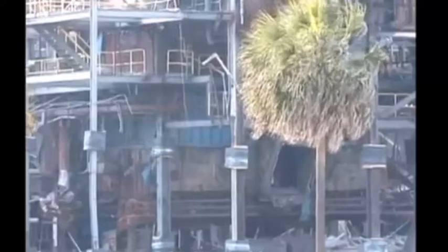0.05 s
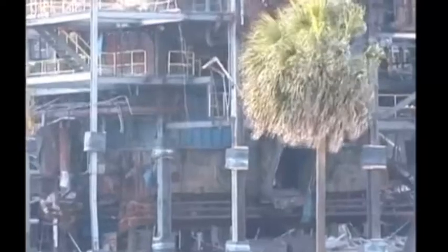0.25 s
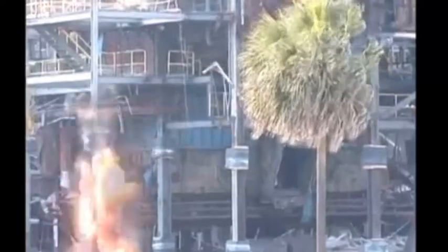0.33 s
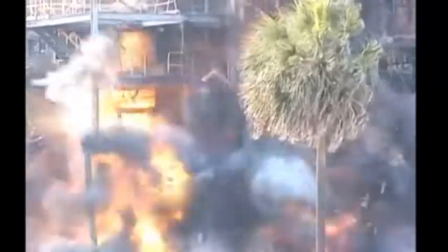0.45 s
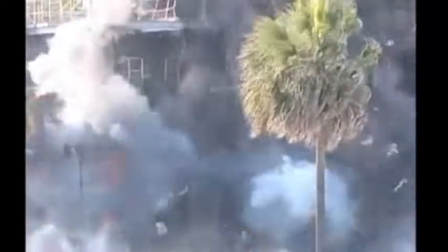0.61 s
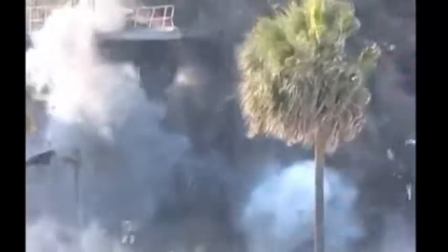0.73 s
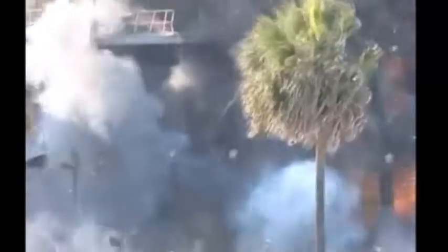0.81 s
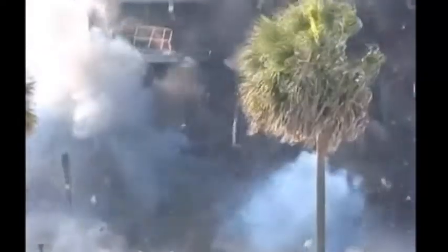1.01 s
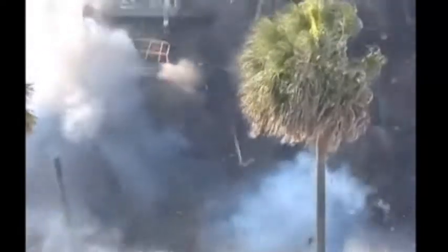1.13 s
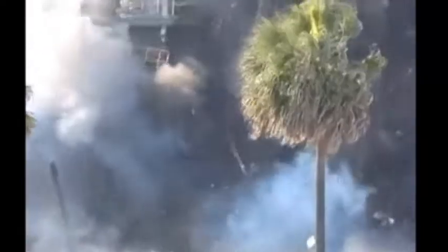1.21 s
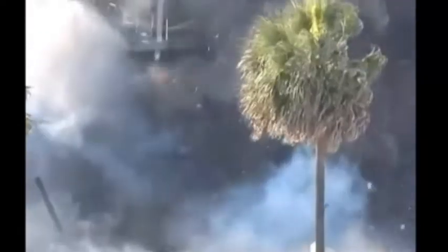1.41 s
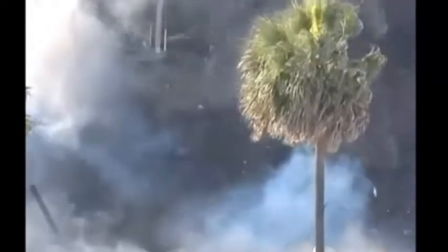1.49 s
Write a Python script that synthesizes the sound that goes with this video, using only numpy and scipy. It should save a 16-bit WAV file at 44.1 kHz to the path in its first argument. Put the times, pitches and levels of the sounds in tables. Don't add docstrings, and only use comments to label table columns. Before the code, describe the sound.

Demolition charges blow in a steel structure outdoors. After brief silence comes a sharp crack, a dense volley of bangs and echoes, then thudding rumble thinning under fine rattling debris, heard through a small camera microphone.

```python
import sys
import numpy as np
from scipy import signal
from scipy.fft import rfft, irfft
from scipy.io import wavfile
from scipy.ndimage import uniform_filter1d

SR = 44100
rng = np.random.default_rng(int(sys.argv[2]) if len(sys.argv) > 2 else 0)


def ratio(d):
    e = np.asarray(d, float) / 20
    return 10 ** e


def file_out(sig):
    cols = np.atleast_2d(sig).T
    lim = np.clip(cols, -1, 1)
    pcm = np.round(lim * 32767).astype(np.int16)
    wavfile.write(sys.argv[1], SR, pcm)


N = 68355
T = np.arange(N) / SR
OPENS_S, SHOCK_S = 0.1915, 0.2178

# pitch_hz, level_db, phase_turns
FRAME_MODES = [
    (808, -18, 0.05),
    (1098, -17, 0.22),
    (2037, -22, 0.54),
    (2830, -22, 0.33),
    (3047, -23, 0.43),
]
RING_UP_DB_PER_S, RING_HOLD_S, RING_OFF_DB_PER_S = 1303, 0.0056, 5000
RING_ROUGHNESS, RING_FILL_DB = .55, -28

# start_s, level_db, fade_t60_s, centre_hz
BURSTS = [(.193, -54, .01, 6000), (.2025, -46, .06, 8000), (.2163, -17, .005, 12500),
          (0.226, -28.5, 0.027, 3500), (0.233, -32, 0.021, 1980), (.240, -22, 0.019, 1760),
          (0.2437, -35.5, .03, 1950), (0.2567, -22, 0.019, 2460), (.2595, -24, 0.014, 2000),
          (.2645, -29.5, 0.045, 3000), (.267, -22, 0.029, 2000), (0.277, -34, 0.044, 3100),
          (0.299, -40, 0.085, 2580), (.329, -30, 0.057, 1660), (.3655, -23, .03, 3000),
          (0.396, -39, 0.02, 2500), (0.422, -24.5, 0.02, 1610), (.440, -37, 0.086, 1470),
          (.503, -33, .09, 3200), (0.517, -28.5, .04, 2756), (.531, -26.5, 0.033, 1410),
          (0.662, -45, 0.036, 3000), (0.815, -36, 0.015, 1287), (.832, -29, 0.02, 1000),
          (.878, -36, 0.033, 1600), (.894, -36, .03, 800), (.961, -35, 0.02, 750), (1.034, -32, .03, 1100),
          (1.079, -36.5, 0.043, 1183)]
BURST_WIDTH, BURST_AIR_DB, BURST_RISE_S, SPIT_POWER = .8, -17, 0.00086, 1.5
AIR_LOSS_DB_PER_S = 60
DULL_TOP_HZ, DULL_TIME_S = 19000, .45

# time_s, level_db
BOOM_LEVEL = [(0.216, -36), (.24, -28), (.29, -28), (.31, -23), (.38, -23.5), (.47, -21.5), (.53, -21),
              (.60, -22), (.64, -36), (.70, -31), (.80, -35), (.90, -33), (1.0, -37), (1.2, -40),
              (1.3, -39), (1.40, -44), (1.55, -43)]
# frequency_hz, level_db
BOOM_COLOUR = [(15, -46), (25, -4), (54, -7.5), (87, -9), (162, -8), (209, -15.5), (232, -18), (400, -26.5),
               (520, -40), (880, -120)]
BOOM_SCATTER_DB, BOOM_MUD_DB = 2.5, -4
SWING_HZ, SWING_SPREAD = 98, .47

# start_s, peak_db, pitch_hz, length_cycles
THUMPS = [(.202, -24, 390, 3), (.2178, -18, 520, 2), (.2185, -17, 300, 1.5), (.222, -15, 170, 1.5),
          (.2385, -13, 85, 1.3), (.252, -18, 110, 1.2), (.262, -14, 240, 1.5), (.267, -13, 170, 1.8),
          (.2775, -7, 77, 1.3), (.291, -12, 125, 1.6), (.336, -19, 150, 2), (.372, -20, 190, 2),
          (.44, -26, 420, 2), (.6655, -27, 260, 2), (.668, -22, 90, 1.5), (.6865, -25, 330, 2),
          (.694, -22, 70, 2.2), (.757, -22, 60, 2.2), (.851, -25, 90, 1.5), (.878, -22, 95, 1.8),
          (.898, -23, 75, 2.5), (.954, -22, 100, 1.8), (1.015, -26, 90, 1.8), (1.128, -30, 70, 1.5),
          (1.265, -30, 60, 2), (1.342, -25, 65, 1.8), (1.52, -31, 65, 1.8)]

# time_s, level_db, treble_tilt_db
DEBRIS_LEVEL = [(0.223, -36, -17.5), (0.252, -29, -10), (0.255, -44, -13), (0.283, -30, -10),
                (.292, -45, -15), (0.309, -38.5, -0.5), (.343, -39.5, 1.5), (.355, -44, -7), (.40, -38, -1),
                (.465, -41, 4), (.485, -44, -4), (.51, -40, 0), (0.549, -44, 2), (.63, -44, 2),
                (.8, -43, -5), (1.1, -44, 2), (1.3, -47, 3), (1.55, -48, 2)]
# frequency_hz, level_db
DEBRIS_COLOUR = [(120, -30), (200, -5), (400, -10.5), (820, -2), (2500, -7), (4800, -15), (7400, -28),
                 (15000, -65)]
RATTLE_PER_S, RATTLE_SCATTER_DB, RATTLE_DB = 900, 4, -7.5
FLICKER_DB, FLICKER_PER_S = 1.1, 45
DUST_AIR_DB, DUST_AIR_T60_S = -17, 1.25

# start_s, level_db, top_hz, sweep_time_s
SNAPS = [(0.2164, -13, 13800, .0004), (.2268, -24, 12000, .0005), (.2567, -19, 10000, .0005),
         (.2597, -23, 9300, .0004), (.2662, -22, 12000, .0004), (.3978, -32, 9000, .0004),
         (.5162, -32, 11000, .0004), (.5312, -33, 11000, .0004), (0.2871, -24, 9000, 0.00045),
         (.3670, -22, 8680, .0005), (.4105, -21, 15000, .0004), (0.4205, -35, 12000, 0.000465),
         (0.4408, -31, 9000, 0.00058), (.6850, -18.5, 8720, 0.00034)]
SNAP_T60_S, SNAP_LOW_HZ = .011, 380

ECHO_T60_S, ECHO_DB = .25, -21
LOW_CUT_HZ, TOP_CUT_HZ = 35.7, 16000


def unit(x):
    return x / np.sqrt(np.mean(x ** 2))


def butter(x, order, hz, kind="low"):
    return signal.sosfilt(signal.butter(order, hz, kind, fs=SR, output="sos"), x)


def colour(x, points):
    freq_hz = np.fft.rfftfreq(N, 1 / SR)
    point_hz, point_db = np.array(points, float).T
    gain_db = np.interp(np.log(freq_hz + 1), np.log(point_hz), point_db)
    return irfft(rfft(x) * ratio(gain_db), N)


def band(x, hz, width):
    return signal.lfilter(*signal.iirpeak(hz, 1 / width, fs=SR), x)


def walk(rate_per_s):
    hold = int(SR / rate_per_s)
    steps = np.repeat(rng.standard_normal(N // hold + 1), hold)
    smooth = uniform_filter1d(uniform_filter1d(steps, hold), hold)
    return unit(smooth[:N])


def add(out, at_s, x):
    i = int(at_s * SR)
    out[i:i + len(x)] += x[:max(N - i, 0)]


def wavelet(hz, cycles, fade=1):
    t = T[:int(cycles / hz * SR)]
    return np.sin(2 * np.pi * hz * t) * (1 - fade * t * hz / cycles)


def frame():
    from_shock = T - SHOCK_S
    rise_db = RING_UP_DB_PER_S * np.minimum(from_shock + RING_HOLD_S, 0)
    cut_db = RING_OFF_DB_PER_S * np.maximum(from_shock, 0)
    fill = unit(butter(rng.standard_normal(N), 8, [500, 3200], "band"))
    modes = np.zeros(N)
    for hz, db, turn in FRAME_MODES:
        rough = 1 + RING_ROUGHNESS * walk(300)
        modes += ratio(db) * rough * np.sin(2 * np.pi * (hz * from_shock + turn))
    return ratio(rise_db - cut_db) * (modes + ratio(RING_FILL_DB) * fill)


def boom():
    swings = []
    for k, (stretch, size) in enumerate(rng.standard_normal((600, 2))):
        swing = wavelet(SWING_HZ * np.exp(SWING_SPREAD * stretch), .5, fade=0)
        swings.append((-1) ** k * ratio(BOOM_SCATTER_DB * size) * swing)
    roll = butter(np.concatenate(swings)[:N], 4, 200)
    mud = colour(rng.standard_normal(N), BOOM_COLOUR)
    mix = unit(unit(roll) + ratio(BOOM_MUD_DB) * unit(mud))
    time_s, level_db = np.array(BOOM_LEVEL, float).T
    mix = mix * ratio(np.interp(T, [OPENS_S, *time_s], [-60, *level_db]))
    return butter(mix, 1, 900)


def bursts():
    out, t = np.zeros(N), T[:SR // 8]
    noises = rng.standard_normal((len(BURSTS), len(t)))
    for (start_s, db, t60_s, hz), noise in zip(BURSTS, noises):
        raw = noise * np.abs(noise[::-1]) ** SPIT_POWER
        body = unit(band(band(raw, hz, BURST_WIDTH), hz, 2 * BURST_WIDTH))
        air_db = BURST_AIR_DB - AIR_LOSS_DB_PER_S * (start_s - SHOCK_S)
        rise = np.minimum(t / (BURST_RISE_S * t60_s / .02), 1)
        puff = (body + ratio(air_db) * raw) * ratio(db - 60 * t / t60_s) * rise
        top_hz = DULL_TOP_HZ * np.exp(-max(start_s - SHOCK_S, 0) / DULL_TIME_S)
        add(out, start_s, butter(puff, 2, top_hz))
    return out


def plant_echo(sharp):
    t = T[:SR // 3]
    tail = band(rng.standard_normal(len(t)), 1900, 3.1) * ratio(-60 * t / ECHO_T60_S)
    tail = tail / np.sqrt(np.sum(tail ** 2))
    return signal.fftconvolve(sharp, tail)[:N] * ratio(ECHO_DB)


def thumps():
    out = np.zeros(N)
    for start_s, db, hz, cycles in THUMPS:
        add(out, start_s, ratio(db) * wavelet(hz, cycles))
    return butter(out, 1, 900)


def debris():
    time_s, level_db, tilt_db = np.array(DEBRIS_LEVEL, float).T
    when, sign, size = rng.random((3, N))
    hits = (when < RATTLE_PER_S / SR) * np.sign(sign - .5)
    rattle = hits * ratio(-RATTLE_SCATTER_DB * np.log(size + 1 / 50))
    raw = colour(rng.standard_normal(N) + ratio(RATTLE_DB) * unit(rattle), DEBRIS_COLOUR)
    low = butter(raw, 1, 2500)
    air = unit(butter(rng.standard_normal(N), 1, [6000, 11000], "band"))
    tilt = ratio(np.interp(T, time_s, tilt_db))
    low_part = low * ratio(FLICKER_DB * walk(FLICKER_PER_S))
    high_part = (raw - low) * tilt * ratio(FLICKER_DB * walk(FLICKER_PER_S))
    air_db = DUST_AIR_DB - 60 * np.maximum(T - SHOCK_S, 0) / DUST_AIR_T60_S
    mix = (low_part + high_part) / np.std(raw) + air * tilt * ratio(air_db)
    return mix * ratio(np.interp(T, [SHOCK_S - .008, *time_s], [-70, *level_db], left=-140))


def snaps():
    out, t = np.zeros(N), T[:SR // 50]
    for start_s, db, top_hz, sweep_s in SNAPS:
        pitch_hz = SNAP_LOW_HZ + (top_hz - SNAP_LOW_HZ) * np.exp(-t / sweep_s)
        sweep = np.sin(2 * np.pi * np.cumsum(pitch_hz) / SR)
        rise = np.minimum(t * top_hz, 1)
        add(out, start_s, ratio(db - 60 * t / SNAP_T60_S) * rise * sweep)
    return out


def scene():
    sharp = snaps() + bursts()
    mix = frame() + boom() + sharp + plant_echo(sharp) + thumps() + debris()
    return (mix * (T > OPENS_S))[None]


def band_limit(x):
    return signal.sosfilt(signal.butter(12, 16580, fs=SR, output="sos"), x)


def record(dry):
    x = signal.sosfiltfilt(signal.butter(2, LOW_CUT_HZ, "high", fs=SR, output="sos"), dry)
    x = x * np.clip((T - OPENS_S) / .002, 0, 1)
    x = signal.sosfilt(signal.ellip(8, .2, 70, TOP_CUT_HZ, fs=SR, output="sos"), x)
    return band_limit(x)


dry = scene()
out = record(dry)
file_out(out)
```